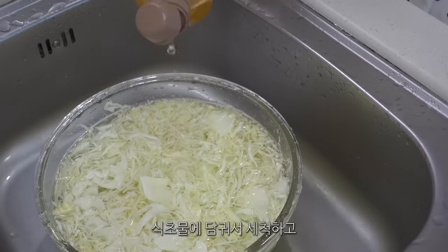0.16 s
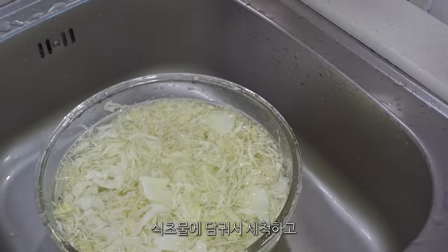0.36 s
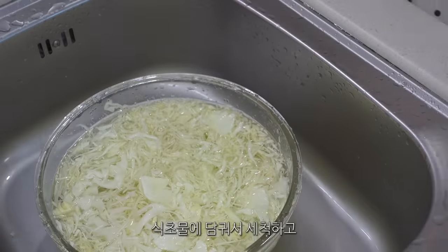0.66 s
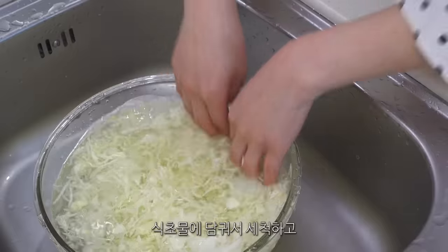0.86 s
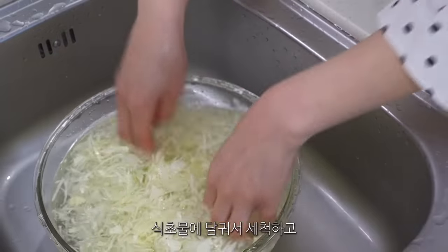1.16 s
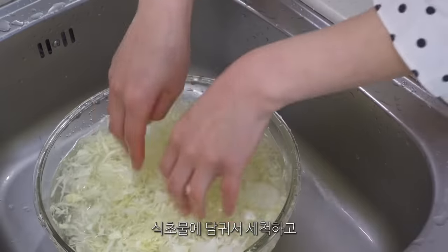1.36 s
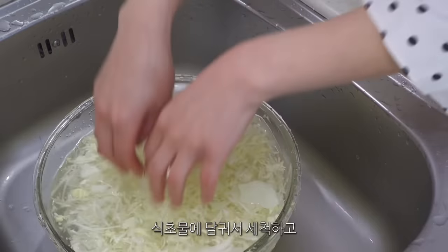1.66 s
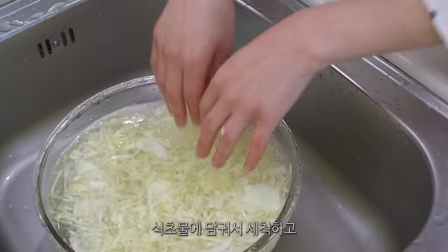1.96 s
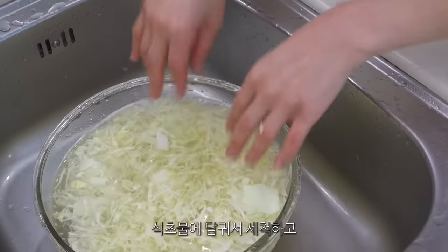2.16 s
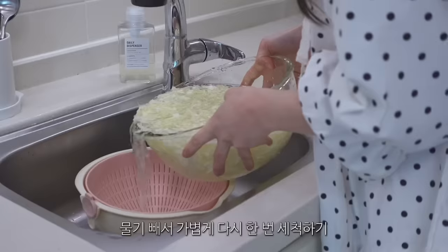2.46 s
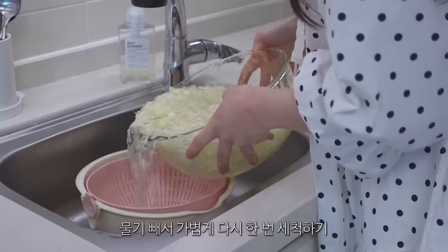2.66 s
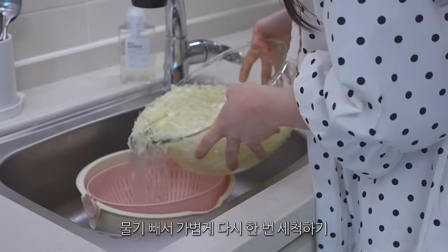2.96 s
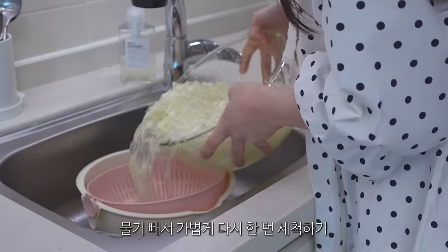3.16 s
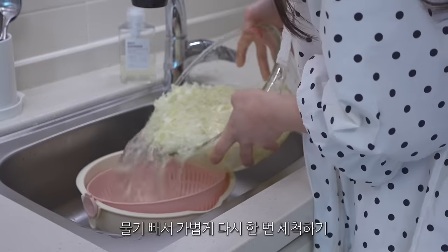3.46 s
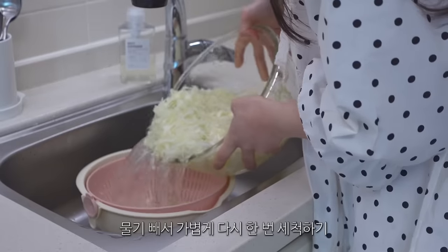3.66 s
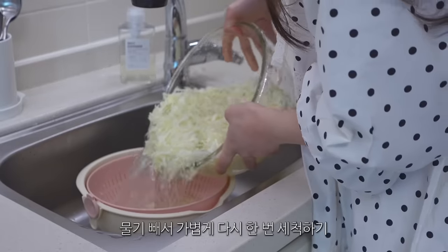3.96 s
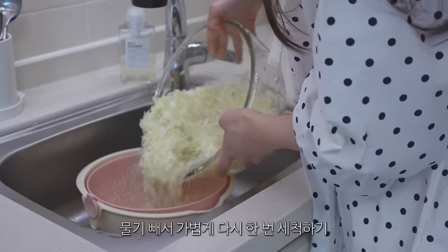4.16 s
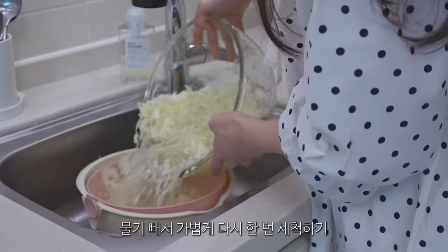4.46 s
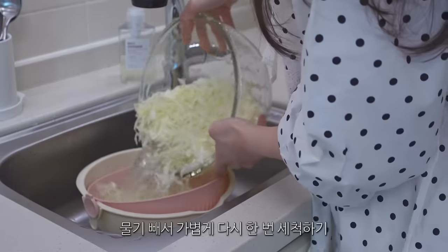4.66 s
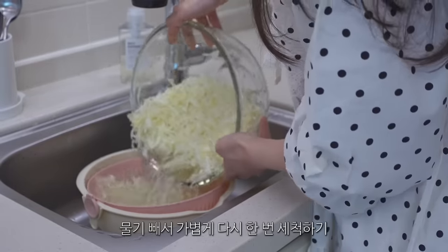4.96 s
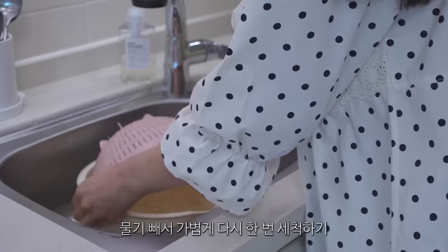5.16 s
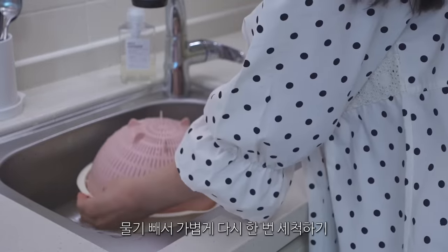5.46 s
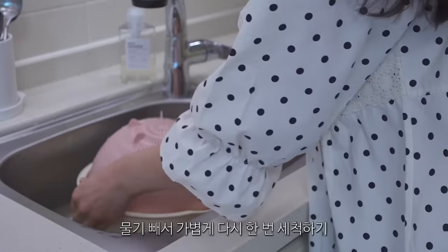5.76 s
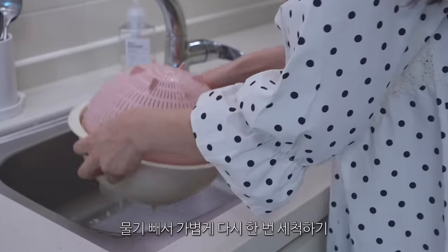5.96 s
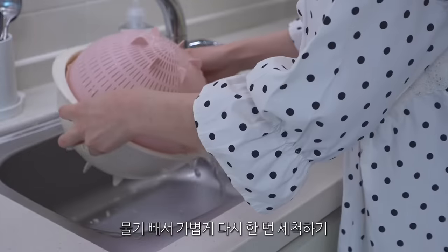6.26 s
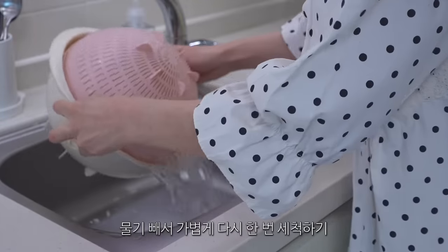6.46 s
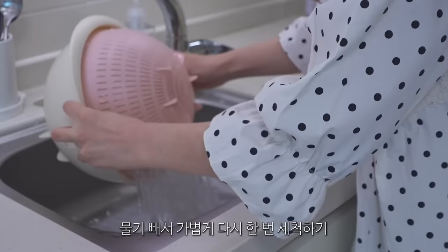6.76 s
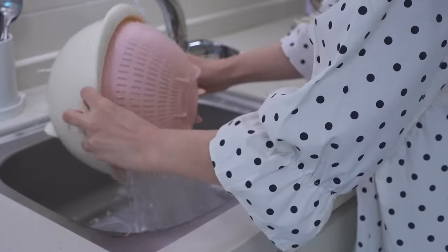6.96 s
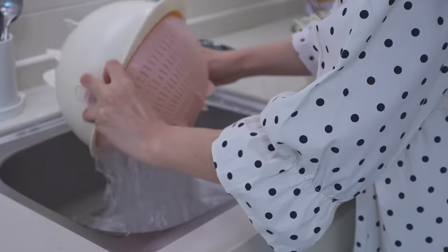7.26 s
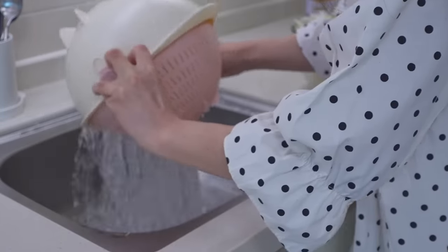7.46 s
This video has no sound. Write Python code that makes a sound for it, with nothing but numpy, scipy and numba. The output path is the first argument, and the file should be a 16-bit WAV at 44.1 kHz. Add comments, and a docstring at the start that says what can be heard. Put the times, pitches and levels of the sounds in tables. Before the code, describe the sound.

Wet shredded cabbage fizzes and swishes in a glass bowl, then water pours into a plastic colander, knocks, and drums onto a steel sink.

```python
"""Water splashes and gurgles as shredded cabbage is washed at a steel kitchen sink, in three moments.
First vinegar drips into a glass bowl and hands swish the fizzing shreds; then the bowl is poured into a
plastic colander; last the colander knocks on its basin and is tipped, so that water drums on steel.
Water is built from random tiny impacts and bubble chirps, knocks from noise that rings the plastic.
Steady hiss, faint hum, quick sink echoes and a short room tail surround it. The sound is nearly mono."""
import sys
import numpy as np
from scipy import signal
from scipy.fft import rfft, irfft, next_fast_len
from scipy.io import wavfile
from scipy.ndimage import uniform_filter1d
from numba import njit

SR = 44100
rng = np.random.default_rng(int(sys.argv[2]) if len(sys.argv) > 2 else 0)


def put_to_file(sound):
    """Save the sound as 16-bit audio at rate SR, in the file named by the first command-line argument."""
    columns = np.atleast_2d(sound).T  # one column per channel
    safe = np.clip(columns, -1, 1)
    whole_steps = np.round(safe * 32767)
    wavfile.write(sys.argv[1], SR, whole_steps.astype(np.int16))


N = 335160  # length in samples
T = np.arange(N) / SR  # time in seconds

# the three moments: stirring, pouring, draining [start_s, end_s]
SHOTS = [(0, 2.452), (2.46, 5.017), (5.017, 7.7)]


def undb(db):
    """Turn decibels into a gain."""
    return 10 ** (np.asarray(db) / 20)


def unit(x):
    """Scale to an average (rms) level of 1."""
    return x / np.sqrt(np.mean(x ** 2) + 1e-20)


def curves(rows):
    """Join each column of a table by straight lines in time; the first column is seconds."""
    s, *columns = np.transpose(rows)
    return [np.interp(T, s, column) for column in columns]


def frequencies(n):
    """The frequency in Hz of each spectrum step, kept above zero."""
    return np.maximum(np.fft.rfftfreq(n, 1 / SR), 1)


def band(x, lo_hz, hi_hz, order=4):
    """Keep the sound between two frequencies, with slopes that let neighbouring bands add up flat."""
    n = next_fast_len(len(x) + 4096)
    f = frequencies(n)
    low_slope = 1 + (lo_hz / f) ** order
    high_slope = 1 + (f / hi_hz) ** order
    return irfft(rfft(x, n) / low_slope / high_slope, n)[:len(x)]


def colour(x, points):
    """Shape the spectrum of a sound by a curve of (Hz, dB) points."""
    hz, db = np.transpose(points)
    gain = undb(np.interp(np.log(frequencies(len(x))), np.log(hz), db))
    return irfft(rfft(x) * gain, len(x))


def ring(x, modes):
    """Add up resonances (Hz, width Hz, dB) that are all driven by x."""
    out = 0
    for hz, width_hz, db in modes:
        b, a = signal.iirpeak(hz, hz / width_hz, SR)
        out = out + undb(db) * signal.lfilter(b, a, x)
    return out


def walk(rate_hz):
    """Slow random wander with a spread near 1, heading for new values at the given rate."""
    k = max(int(SR / rate_hz), 2)
    steps = np.repeat(rng.standard_normal(N // k + 1), k)
    return 1.43 * uniform_filter1d(steps, k)[:N]


def add(out, s, x):
    """Mix x into out from time s."""
    i = int(s * SR)
    out[i:i + len(x)] += x[:N - i]


def pouring(full_db=-24, spray_db=1.5, spray_loss_db=3, gurgle_db=-11, drum_db=-28, cushion_db=7,
            weight=1.2, shallow=0.054, note_db=-25, note_fade_db_per_s=5):
    """A heavier stream has more bass; the rising pool gurgles, and cushions spray and drumming."""
    # strength of the stream as the bowl is tipped [time_s, flow_db]
    stream = [(2.495, -71), (2.525, -43), (2.56, -36.5), (2.66, -31.5), (2.88, -24), (3.2, -23), (3.6, -24),
              (3.88, -23.5), (4.1, -27), (4.28, -26), (4.38, -24), (4.66, -26.5), (4.76, -30.5),
              (4.99, -31.5), (5.015, -36)]
    # overall spectrum of the poured water [pitch_hz, level_db]
    spectrum = [(26, -76), (45, -45), (132, -38.5), (173, -26.5), (220, -22), (296, -26.5), (396, -18),
                (558, -8), (805, -12), (1080, -3), (1480, -3), (1680, -1), (1940, -3.5), (6430, -7),
                (15500, -17)]
    # hollow note of the basin under the falling water [pitch_hz, width_hz, level_db]
    basin_modes = [(566, 70, 0)]
    fill_start_s, fill_length_s = 2.81, 1.31  # the basin fills at a steady pace

    flow_db, = curves(stream)
    depth = np.clip((T - fill_start_s) / fill_length_s, 0, 1)
    heavy_db = weight * (flow_db - full_db)
    pool_db = 20 * np.log10(np.hypot(depth ** 1.77, shallow))
    texture = patter(4000, 3.2, 2600, 2.53, -2.3, 4.26)
    water = falling_water(flow_db, spray_db - spray_loss_db * depth, gurgle_db + heavy_db + pool_db,
                          drum_db + heavy_db - cushion_db * depth, spectrum, texture,
                          surge_db=0.82, flicker_db=1.52)
    basin_db = flow_db + note_db - note_fade_db_per_s * (T - fill_start_s)
    basin = note(texture, basin_modes, flicker_db=6) * undb(basin_db) * (T > fill_start_s)
    return (water + basin + trapped_air(flow_db, rate=12, over_db=9)) * (T > stream[0][0])


def draining(full_db=-16, spray_db=0, gurgle_db=-14, drum_db=-24, thin_spray=0.33, thin_gurgle=0.23,
             thin_drum=0.35, note_db=-51):
    """The basin empties on to bare steel; while the stream is thin, spray and sink ring stand out more."""
    # strength of the stream as the basin is tipped [time_s, flow_db]
    stream = [(6.45, -76), (6.475, -40.5), (6.6, -36), (6.74, -21.5), (6.82, -22.5), (6.93, -17),
              (7.12, -16), (7.6, -15)]
    # overall spectrum of the drained water [pitch_hz, level_db]
    spectrum = [(26, -80), (45, -45), (135, -40), (164, -28.5), (275, -13.5), (368, -9), (426, -14.5),
                (631, -8), (767, -9), (1220, -2), (1450, -3), (1800, 0), (3940, 0.5), (8010, -3),
                (15500, -13.5)]
    # note of the sink under the drained water [pitch_hz, width_hz, level_db]
    sink_modes = [(831, 49, 0)]

    flow_db, = curves(stream)
    thin_db = full_db - flow_db
    texture = patter(9000, 2.84, 4000, 1.9, -4.5, 5.5)
    water = falling_water(flow_db, spray_db + thin_spray * thin_db, gurgle_db + thin_gurgle * thin_db,
                          drum_db + thin_drum * thin_db, spectrum, texture,
                          surge_db=0.5, flicker_db=0.42)
    sink = note(texture, sink_modes, flicker_db=4) * undb(np.minimum(note_db, flow_db - 7))
    return (water + sink + trapped_air(flow_db, rate=10, over_db=7)) * (T > stream[0][0])


def falling_water(flow_db, spray_db, gurgle_db, drum_db, spectrum, texture, surge_db, flicker_db):
    """A ragged stream: splash and spray on top, gurgling in the vessel, drumming of its bottom."""
    # resonances of the sink and its vessels, over the plain splash [pitch_hz, width_hz, level_db]
    sink_modes = [(223, 21.9, -3.5), (270, 12, 2), (356, 20, -5), (446, 14, 1), (570, 19, -17),
                  (623, 8.2, 2.5), (1680, 80, -18.5), (2184, 65, -16)]
    # a thin stream traps only small, high bubbles [time_s, lowest_splash_pitch_hz]
    splash_edge = [(2.52, 1630), (2.68, 1460), (2.82, 1070), (3.3, 870), (5.0, 856), (6.46, 3330),
                   (6.6, 2720), (6.7, 1670), (6.82, 806)]
    # gurgle rises as the basin fills, sinks as the drained stream thickens [time_s, lowest_gurgle_pitch_hz]
    gurgle_edge = [(2.8, 450), (4.3, 422), (4.72, 600), (4.9, 720), (6.62, 685), (6.75, 350)]

    water = colour(texture + ring(texture, sink_modes), spectrum)
    drum = unit(band(water, 48, 430, order=16))
    gurgle = unit(band(water, 430, 1000, order=16))
    splash = unit(band(water, 1000, 4500, order=16))
    spray = unit(band(water, 4500, 19000, order=16))
    splash = low_cut(splash, splash_edge)
    gurgle = low_cut(gurgle, gurgle_edge, order=14, depth_db=-18)
    surge = flow_db + surge_db * walk(70)  # the stream arrives in lumps
    parts = [(splash, 0), (spray, spray_db), (gurgle, gurgle_db), (drum, drum_db)]
    return sum(part * undb(surge + db + flicker_db * walk(60)) for part, db in parts)


def low_cut(x, edge, order=9, depth_db=-16):
    """Thin out what lies under a moving edge (s, Hz), keeping the loudness."""
    f, t, frames = signal.stft(x, SR, nperseg=512)
    edge_hz = np.interp(t, *np.transpose(edge))
    gain = undb(depth_db) + 1 / (1 + (edge_hz / np.maximum(f, 1)[:, None]) ** order)
    y = signal.istft(frames * gain, SR)[1][:N]
    before, after = (np.abs(uniform_filter1d(v ** 2, SR // 10)) for v in (x, y))
    return y * np.sqrt(before / (after + 1e-12))


def note(texture, modes, flicker_db):
    """A hollow note that the falling drops excite unevenly."""
    return unit(ring(ring(texture, modes), modes) * undb(flicker_db * walk(30)))


def trapped_air(flow_db, rate, over_db, lowest_hz=1150, highest_hz=5200, scatter_db=2, cycles=5.0):
    """Large bubbles trapped at random; the stronger the stream, the louder they are."""
    when, pitch, size = rng.random((int(rate * N / SR), 3)).T
    hz = lowest_hz * (highest_hz / lowest_hz) ** pitch
    db = flow_db[(when * N).astype(int)] + over_db + scatter_db * (2 * size - 1)
    bubbles = chirps(when * N / SR, hz, cycles * np.sqrt(hz / 2500), undb(db), 0.022)
    return band(bubbles, 800, 19000)


def patter(drop_rate, drop_scatter_db, bubble_rate, bubble_scatter_db, bubble_db, cycles):
    """Plain water texture: drop impacts and trapped bubbles (rates per second), many small, few large."""
    hit = rng.random(N) < drop_rate / SR
    drop_db = drop_scatter_db * np.minimum(rng.exponential(size=N), 4.3)
    drops = hit * rng.choice([-1, 1], N) * undb(drop_db)
    when, pitch, life, chance = rng.random((int(bubble_rate * N / SR), 4)).T
    hz = 500 + 13000 * pitch ** 2
    size = hz ** 0.75 * undb(bubble_scatter_db * np.minimum(-np.log(1 - chance), 4.5))
    ring_cycles = cycles * (0.5 + life) * (hz / 2000) ** 0.5
    bubbles = chirps(when * N / SR, hz, ring_cycles, size, 0.036)
    return unit(unit(drops) + undb(bubble_db) * unit(bubbles))


@njit
def chirps(start, hz, cycles, size, rise):
    """Bubbles: decaying sines whose pitch climbs as they near the surface."""
    out = np.zeros(N)
    for k in range(len(start)):
        life = cycles[k] * SR / hz[k]  # fading time in samples
        first = int(start[k] * SR)
        phase = 0.
        for i in range(min(int(5 * life), N - first)):
            phase += 2 * np.pi * min(hz[k] * (1 + rise * i / life), .45 * SR) / SR
            soft_start = 1 - np.exp(-(phase / 8) ** 2)
            out[first + i] += size[k] * soft_start * np.exp(-i / life) * np.sin(phase)
    return out


def stirring(treble_db=0.5, swish_treble_db=-4, slosh_ratio=1.05, resting_db=-12, bump_db=-28):
    """Wet shreds fizz with stray bubbles; each plunge adds a swish, bumps the bowl and leaves a low slosh."""
    # the vinegar and each plunge of the hands [time_s, swish_db, slosh_db, slosh_pitch_hz]
    plunges = [(0.29, -51, -48, 1000), (0.909, -39, -43, 1180), (1.234, -39.5, -32.5, 900),
               (1.503, -40.5, -42.5, 760), (1.875, -50, -48, 600)]
    # spectrum of the fizz [pitch_hz, level_db]
    spectrum = [(88, -51), (150, -18), (308, -10), (509, -20), (631, -16), (1150, -5.5), (1240, -2),
                (1830, 2), (1980, 2), (4560, -3.5), (6230, 3.5), (15500, 1)]
    swish_rise_s, swish_fall_s, slosh_s = 0.032, 0.055, 0.026
    # the shreds fizz up from the moment the vinegar reaches them, and slowly calm down
    fizz_start_s, fizz_attack_s, fizz_db, fizz_fade_db_per_s = 0.246, 0.034, -53, 1.5

    texture = patter(14000, 4.9, 2000, 0.8, -4, 1.9)
    fizz = colour(texture, spectrum) * undb(walk(41.26))
    bump = undb(bump_db) * unit(band(texture, 45, 260))
    calm_db = fizz_db - fizz_fade_db_per_s * (T - fizz_start_s)
    swish, slosh = 0, 0
    for s, swish_db, slosh_db, hz in plunges:
        before, after = np.maximum(s - T, 0), np.maximum(T - s, 0)
        swish = swish + undb(swish_db) * np.exp(-before / swish_rise_s - after / swish_fall_s)
        cavity = unit(band(texture, hz / slosh_ratio, hz * slosh_ratio, order=6))
        slosh = slosh + undb(slosh_db) * (cavity + bump) * (T > s) * np.exp(-after / slosh_s)
    body = unit(band(fizz, 216, 5300, order=8)) * np.hypot(undb(calm_db), swish)
    treble_level = np.hypot(undb(calm_db + treble_db), swish * undb(swish_treble_db))
    treble = unit(band(fizz, 4900, 18200, order=8)) * treble_level
    strays = trapped_air(calm_db, rate=9.5, over_db=9.5, lowest_hz=1720, highest_hz=3930, cycles=7.6)
    fade_in = np.clip((T - fizz_start_s) / fizz_attack_s, undb(resting_db), 1)
    return (body + treble + slosh + strays) * fade_in


def splashes(gain_db=-2, scatter_db=3, lowest_hz=700, bubble_db=-5, cycles=4.9, count=5):
    """Each splash is a quick cloud of impacts with a few trapped bubbles, pitched around its centre."""
    # loudest drips, slaps and gushes, level before gain_db
    # [time_s, level_db, centre_hz, spread_octaves, length_s]
    bursts = [(0.027, -47, 9300, 0.31, 0.0079), (0.159, -41, 7600, 0.53, 0.0083),
              (0.2596, -36.5, 8850, 0.85, 0.0063), (0.374, -35, 3850, 0.8, 0.035),
              (0.478, -34.5, 5000, 0.48, 0.014), (0.515, -40.5, 3000, 0.89, 0.033),
              (0.588, -39, 2190, 0.61, 0.011), (0.899, -29.5, 4500, 1.1, 0.006),
              (1.495, -31.5, 3570, 1.2, 0.009), (0.868, -37, 5540, 0.58, 0.042),
              (0.949, -21.5, 4200, 0.94, 0.0076), (0.9645, -27.5, 8350, 0.49, 0.012),
              (0.999, -24.5, 2500, 0.13, 0.0063), (1.151, -39, 9550, 0.36, 0.0037),
              (1.196, -30.5, 8300, 0.55, 0.011), (1.233, -10.5, 6130, 1.35, 0.0022),
              (1.535, -23.5, 6330, 0.67, 0.0028), (1.5418, -18.5, 7800, 0.64, 0.0062),
              (1.62, -44, 5400, 0.64, 0.012), (1.834, -37.5, 6870, 0.6, 0.026),
              (1.875, -32, 6400, 0.92, 0.0067), (1.987, -42, 5200, 0.83, 0.021),
              (2.75, -16, 3700, 0.55, 0.009), (2.811, -23, 4670, 0.95, 0.019),
              (3.087, -11, 5810, 0.2, 0.0017), (3.172, -17, 2180, 0.43, 0.036),
              (3.367, -20, 6240, 0.31, 0.0055), (3.24, -20, 1575, 1.1, 0.015),
              (3.8, -22.5, 4070, 1.1, 0.014), (3.906, -23, 2840, 0.76, 0.0092),
              (4.0654, -18, 5320, 0.44, 0.016), (4.184, -20, 3000, 0.75, 0.019),
              (4.315, -12, 2030, 0.7, 0.017), (4.406, -17.5, 3290, 0.74, 0.0089),
              (4.549, -17.5, 3960, 1, 0.017), (4.8124, -19.5, 3200, 0.7, 0.0056),
              (4.966, -20.5, 2070, 0.58, 0.007), (6.4746, -26.5, 5250, 0.53, 0.013),
              (6.524, -29, 5800, 0.4, 0.02), (6.604, -24.5, 5400, 0.66, 0.0065),
              (6.658, -22, 5900, 0.96, 0.012), (7.334, -14.5, 3280, 0.44, 0.019)]

    out, t = np.zeros(N), T[:8192]
    f = frequencies(len(t))
    for s, db, hz, spread, length in bursts:
        impacts = rng.standard_normal(len(t)) * undb(scatter_db * rng.standard_normal(len(t)))
        shape = np.exp(-(np.log2(f / hz) / spread / 2) ** 2) / np.sqrt(f)
        cloud = irfft(rfft(impacts) * shape) * np.exp(-(t / length) ** 1.12)
        when, pitch, size = rng.random((3, count))
        bubble_hz = hz * 2 ** (spread * (2 * pitch - 1))
        bubbles = chirps(when * length, bubble_hz, np.full(count, float(cycles)), size, 0.028)
        burst = unit(cloud) + undb(bubble_db) * unit(bubbles[:len(t)])
        add(out, s, burst * undb(db + gain_db) * np.sqrt(length * SR / len(t)))
    # small splashes radiate hardly any bass
    return signal.sosfilt(signal.butter(3, lowest_hz, "high", fs=SR, output="sos"), out)


def plinks(gain_db=1, rise=0.0095, lowest_hz=600, calm_cycles=9, stream_cycles=5.3):
    """Large bubbles that stand out of the wash; they ring longer in the calm bowl than under a stream."""
    # single air bubbles, level before gain_db [time_s, pitch_hz, level_db]
    bubbles = [(0.38, 3500, -26), (0.39, 4980, -22), (0.592, 3010, -28), (0.933, 3530, -20.5),
               (0.968, 8000, -15.5), (1.003, 2480, -13), (1.542, 5870, -14), (2.751, 2980, -8.5),
               (3.191, 1980, -6), (3.223, 2090, -4.5), (3.329, 1680, -7), (3.745, 4850, -4.5),
               (3.779, 4730, -7), (3.889, 2150, -6.5), (4.646, 1370, -9.5), (4.678, 1710, -7),
               (4.848, 1380, -15), (4.895, 1400, -12), (4.969, 1266, -15), (4.984, 2050, -9),
               (6.473, 4070, -13), (6.633, 3190, -13), (6.749, 2330, -8), (7.076, 3730, -2),
               (7.344, 3300, -4), (7.471, 1210, -1.5), (7.54, 1190, -4), (7.562, 1206, -4)]

    s, hz, db = np.transpose(bubbles).astype(float)
    cycles = np.where(s < SHOTS[0][1], calm_cycles, stream_cycles) * np.sqrt(hz / 2500)
    return band(chirps(s, hz * (1 - rise), cycles, undb(db + gain_db), rise), lowest_hz, 19000)


def knocks(tail_db=-14, tail_s=0.036, lowest_hz=160):
    """Soft bumps ring the hollow plastic; the rims tick and chatter against each other."""
    # colander bumped by bowl, falling clumps and basin [time_s, body_db, tick_db, contact_s]
    bumps = [(2.49, -49.5, -60, 0.026), (2.811, -39, -36, 0.0088), (3.242, -41.5, -50, 0.02),
             (3.3, -43, -52, 0.02), (3.536, -37, -52, 0.016), (4.704, -57, -47, 0.015),
             (5.057, -57, -50.5, 0.031), (5.455, -41, -32.5, 0.01), (5.476, -44, -47, 0.034),
             (5.587, -65, -44.5, 0.0037), (5.716, -71, -51, .008), (6.363, -56.5, -53.5, 0.017),
             (6.455, -53, -54.5, .012)]
    # resonances of colander and basin [pitch_hz, width_hz, level_db]
    plastic = [(185, 22, -4), (229, 30, -5.5), (345, 24, -3), (447, 23, 1), (600, 60, -23), (876, 25, -9),
               (1204, 68, -7), (1230, 60, -9)]
    # spectrum of the rim ticks [pitch_hz, level_db]
    tick_spectrum = [(150, -25), (700, -7.5), (1300, -3), (2200, -3), (3600, -5.5), (6000, -12.5),
                     (10000, -24.5), (16000, -46)]

    push, tick = np.zeros(N), np.zeros(N)
    t = T[:16384]
    for s, body_db, tick_db, length in bumps:
        contact = np.exp(-t / length) + undb(tail_db) * np.exp(-t / tail_s)
        add(push, s, undb(body_db) * contact)
        add(tick, s, undb(tick_db) * contact)
    noise = rng.standard_normal(N)
    body = ring(noise * push, plastic) / np.std(ring(noise, plastic))
    ticks = tick * unit(colour(rng.standard_normal(N), tick_spectrum))
    return band(body, lowest_hz, 6000, order=8) + ticks


def handling(gain_db=-4.5):
    """Faint rubbing and dribbling while the colander is gripped, made of water texture."""
    # hands and sleeves shifting on the wet plastic, level before gain_db [time_s, level_db]
    grip = [(5.03, -53), (5.1, -52.5), (5.556, -50.5), (5.666, -53), (5.788, -53), (6.054, -86),
            (6.396, -59), (6.44, -59)]
    # spectrum of the rubbing [pitch_hz, level_db]
    spectrum = [(59, -59), (100, -29), (177, -12.5), (406, -10), (736, -8), (950, -8), (1360, -3.5),
                (1680, -8), (3400, -6.5), (3780, -9), (16000, -19)]

    level_db, = curves(grip)
    rubbing = unit(colour(patter(5000, 1.9, 740, 2.5, -12, 8.7), spectrum))
    return rubbing * undb(level_db + gain_db + walk(40))


def thud(start_s=0.316, hz=163, db=-47, t60_s=0.23, attack_s=0.0018):
    """One dull, low bump while the vinegar goes in: a fading sine."""
    t = np.maximum(T - start_s, 0)
    return undb(db - 60 * t / t60_s) * (1 - np.exp(-t / attack_s)) * np.sin(2 * np.pi * hz * t)


def sink_echoes(x, t60_s, size=1024):
    """Quick echoes between steel walls; they keep changing, since the water lands in ever new places."""
    out, t = np.zeros(N), T[:2 * size]
    fade = undb(-60 * t / t60_s) * (t > .001)
    window = np.sin(np.pi * np.arange(2 * size) / (2 * size))
    for i in range(0, N, size):
        piece = x[i:i + 2 * size]
        walls = rng.standard_normal(len(t)) * fade / np.linalg.norm(fade)
        add(out, i / SR, signal.fftconvolve(piece * window[:len(piece)], walls))
    return out


def kitchen(x):
    """The room's short tail, duller as it fades: decaying noise in three bands."""
    # room tail in each band; t60 is the time to fade by 60 dB [low_hz, high_hz, t60_s, level_db]
    tails = [(100, 1500, 0.57, -6.5), (1490, 4300, 0.24, -9.5), (4500, 25000, 0.25, -12.5)]

    t, response = T[:SR // 2], 0
    for lo_hz, hi_hz, t60_s, db in tails:
        tail = rng.standard_normal(len(t)) * undb(-60 * t / t60_s) * (t > .006)
        response = response + undb(db) * band(tail / np.linalg.norm(tail), lo_hz, hi_hz)
    return signal.fftconvolve(x, response)[:N]


def air(spectrum, db, side_db=-8):
    """Steady hiss of the quiet kitchen: shaped noise, with a softer part opposite in left and right."""
    mid, side = (unit(colour(rng.standard_normal(N), spectrum)) for _ in range(2))
    return undb(db) * (mid + undb(side_db) * side * np.array([[1], [-1]]))


def hum(hz=60, db=-91):
    """Very faint mains hum: one steady sine."""
    return undb(db) * np.sqrt(2) * np.sin(2 * np.pi * hz * T)


def scene(direct_db=-1.98, sink_db=-7, sink_t60_s=0.028, side_db=-13, left_db=0.33):
    """Each moment rings in the same sink and room and ends at its cut."""
    # spectrum of the hiss in the first moment [pitch_hz, level_db]
    bowl_air = [(18, -54), (30, -31), (420, -7.5), (532, -8), (1260, -6), (1440, -14), (1720, -6),
                (2180, -11.5), (15500, -24)]
    # spectrum of the hiss in the other two moments [pitch_hz, level_db]
    room_air = [(18, -59), (30, -41), (546, -8), (691, -7), (808, -10), (970, -5.5), (1290, -9),
                (15500, -18.5)]
    # how much the reflections differ between left and right [pitch_hz, level_db]
    width = [(50, 2), (125, -11), (300, -4.5), (550, -0.5), (1050, -2.5), (2000, -14), (4000, 2), (8000, 2),
             (14000, 0)]

    waters = [stirring(), pouring(), undb(-1) * draining() + handling()]
    airs = [air(bowl_air, -61) + hum(), air(room_air, -58), air(room_air, -60.5)]
    events = splashes() + plinks() + knocks() + thud()
    out = 0
    for (start, end), water, hiss in zip(SHOTS, waters, airs):
        on = (T >= start) & (T < end)
        close = (water + events) * on
        # two independent sets of reflections: shared by both ears, and opposite in left and right
        mid, side = (undb(sink_db) * sink_echoes(close, sink_t60_s) + kitchen(close) for _ in range(2))
        stereo = undb(side_db) * colour(side, width) * np.array([[1], [-1]])
        out = out + on * (undb(direct_db) * close + mid + stereo + hiss)
    return out * undb([[left_db], [-left_db]])


def record(dry):
    """Peaks over full scale are clipped and the top above 15950 Hz is cut."""
    top_cut = signal.ellip(10, .1, 80, 15950, fs=SR, output="sos")
    return signal.sosfilt(top_cut, np.clip(dry, -1, 1))


dry = scene()
out = record(dry)
put_to_file(out)
```